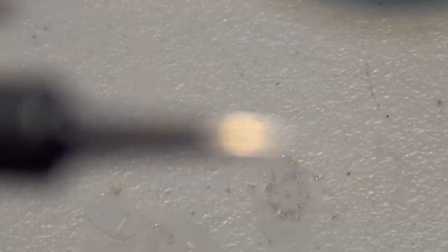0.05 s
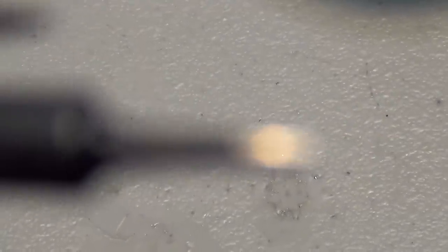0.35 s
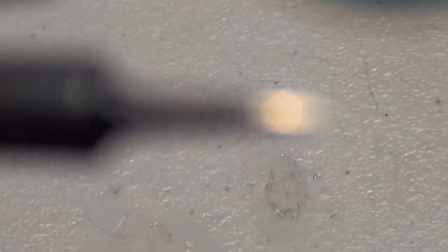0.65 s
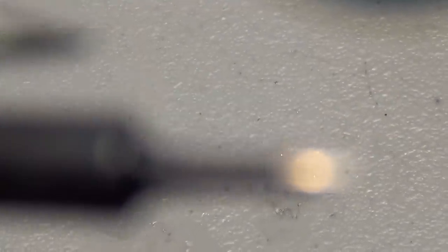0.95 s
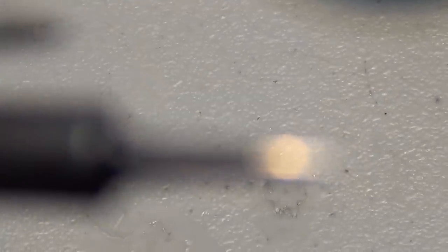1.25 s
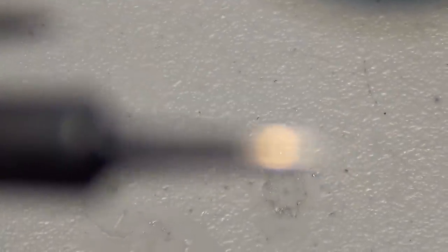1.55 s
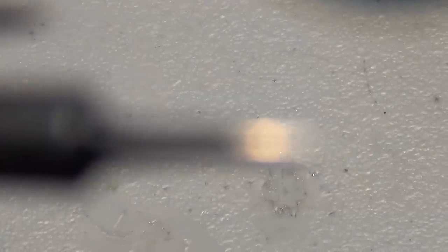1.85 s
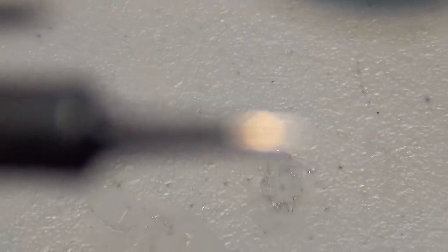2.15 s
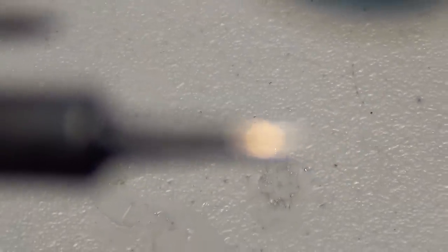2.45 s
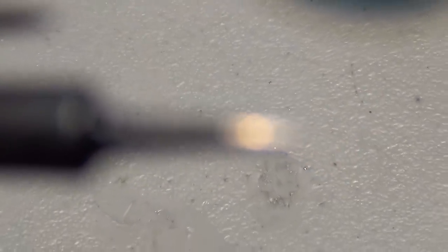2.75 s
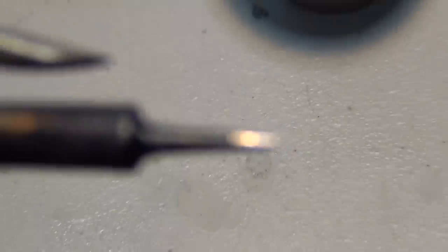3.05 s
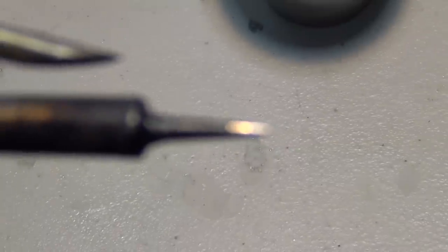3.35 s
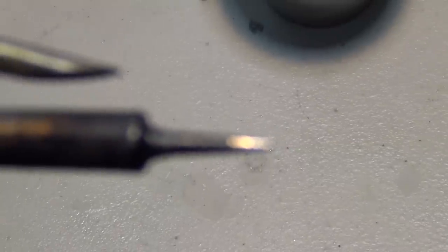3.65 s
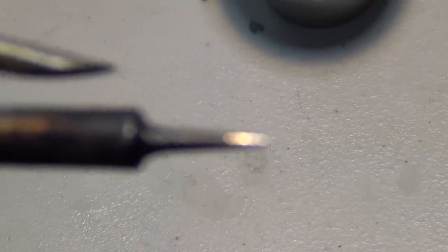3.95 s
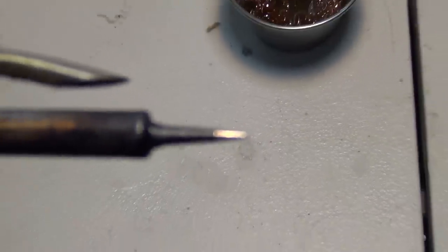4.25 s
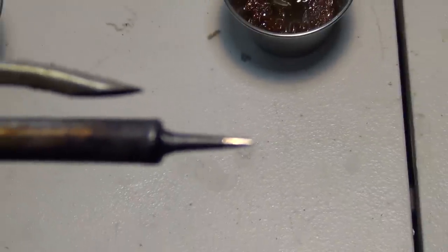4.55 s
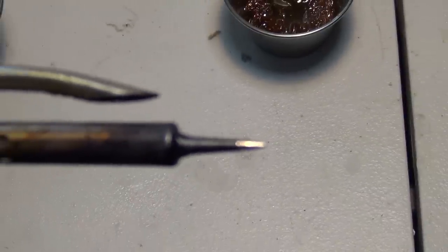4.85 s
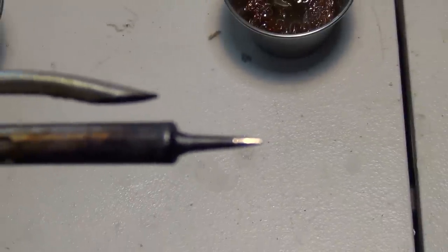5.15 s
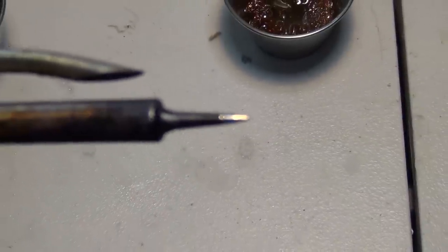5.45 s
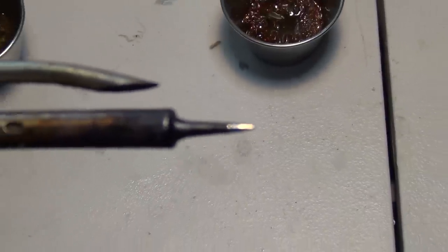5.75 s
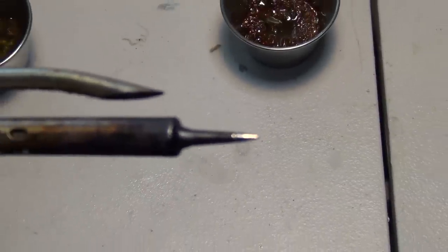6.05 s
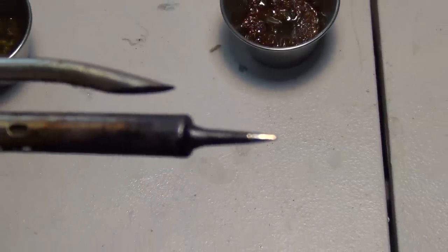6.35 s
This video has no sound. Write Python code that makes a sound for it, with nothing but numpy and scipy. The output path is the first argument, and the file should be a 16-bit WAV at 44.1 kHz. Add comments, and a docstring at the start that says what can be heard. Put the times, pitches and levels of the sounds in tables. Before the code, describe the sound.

Four small plastic clicks cut through a steady airy fan, high hiss and the fluttering whine of a close tape mechanism.

```python
"""A small fume extractor fan runs steadily on a workbench: its air rushes and rings in the housing,
and its blades hum. A thin high hiss sits in the centre, apart from the fan's rush. Close to the
microphone a camera's tape drum whines, and chirps on each of its 30 turns a second as the head
meets the tape. After one faint ping, a small plastic part clicks four times, each time
favouring different ringing pitches."""
import sys
import numpy as np
from scipy import signal
from scipy.fft import rfft, irfft, next_fast_len
from scipy.io import wavfile
from scipy.ndimage import uniform_filter1d, map_coordinates

SR = 44100
rng = np.random.default_rng(int(sys.argv[2]) if len(sys.argv) > 2 else 0)


def waveform_to_disk(signal):
    """Save audio, clipped to [-1, 1], as 16-bit WAV at the path in sys.argv[1]."""
    frames = np.transpose(np.atleast_2d(signal))
    scaled = np.clip(frames, -1, 1) * 32767
    samples = np.round(scaled).astype(np.int16)
    wavfile.write(sys.argv[1], SR, samples)


N = 287532
TIME = np.arange(N) / SR

# tone colour of the thin high hiss: pitch_hz, relative_db
HISS_COLOUR = [(3000, -33), (6000, -10), (7000, -11.5), (7700, -5.5), (8450, -0.5), (9800, -8),
               (10700, -12), (11400, -23.5), (13000, -45)]
# slow swell of the hiss: time_s, level_db
HISS_SWELL = [(0.0, -34.5), (2.35, -31.5), (2.7, -33.7), (3.93, -33), (5.99, -33.6), (6.4, -29.5),
              (6.52, -31)]
# tone colour of the fine fizz above the hiss: pitch_hz, relative_db
FIZZ_COLOUR = [(9500, -25), (11200, -2), (12400, -1.5), (13050, -0.5), (14200, -4.5), (15200, -16)]
# slight swell of the fizz: time_s, level_db
FIZZ_SWELL = [(0, -47.3), (0.5, -46), (2.3, -44.5), (2.8, -48), (4.4, -46), (6.0, -47), (6.5, -45)]
# the ways the plastic part rings: pitch_hz, relative_db, ring_s (time to fade by 60 dB)
PLASTIC_MODES = [(1244, -3.5, 0.024), (1430, -5.5, 0.017), (1730, -5, 0.016), (2190, -9.5, 0.023),
                 (2580, -5.5, 0.014), (2850, -1.5, 0.017), (3570, -1.5, 0.018), (4220, -1, 0.012),
                 (4565, -2, 0.015), (4860, -0.5, 0.012), (5670, -4, 0.013), (8200, 6.5, 0.0063)]
# its clicks: start_s, level_db, low_boost_hz, high_boost_hz, boost_db, tilt_db_per_octave, crack_db
CLICKS = [(3.058, -5, 2200, 4490, 9, -1, -15), (3.8802, -13, 1305, 2220, 13, -2, -17),
          (4.1880, -6.5, 2830, 4760, 9, 0.5, -15), (5.8183, -4.5, 2200, 2750, 3, 0.3, -11.5)]
# strong tones of the drum motor: multiple_of_turn_rate, level_db
MOTOR_TONES = [(10, -42), (22, -49.7), (26, -49), (30, -52), (35, -50), (39, -45), (40, -50.5), (58, -49.5),
               (66, -53.5), (68, -54), (98, -56)]
# tone colour of the head scuffing the tape: pitch_hz, relative_db
SCUFF_COLOUR = [(2000, -3), (3300, 5), (4800, 7.5), (6500, -8), (7600, 17.5), (9000, 3), (11000, -78)]
# weaker chirps as the head sweeps on: delay_s, settled_hz, level_db, left_minus_right_db
AFTER_CHIRPS = [(.005, 5780, -35.5, 5), (.009, 6140, -32.5, 9), (0.0106, 5520, -28, 3),
                (0.0130, 5480, -29.5, 1), (0.0195, 5480, -36.5, 4)]
# electrical hum and a thin whistle: pitch_hz, level_db
ELECTRIC_TONES = [(60, -51.5), (120, -45.5), (15734, -77)]
# weaker blade tones: multiple_of_blade_rate, level_db
WEAK_BLADE_TONES = [(1, -52.5), (4, -56)]
# swell of the tone at twice the blade rate: time_s, relative_db
SECOND_TONE_SWELL = [(0.1, -37.5), (0.73, -39.5), (0.75, -43), (2.3, -37.5), (3.2, -41), (3.21, -51),
                     (3.67, -40), (3.71, -45), (3.92, -34.5), (4.36, -46), (4.92, -48), (4.94, -38.5),
                     (5.7, -39), (5.71, -48.5), (6.42, -39.5)]
# slow beating near 390 Hz, at three times the blade rate: time_s, relative_db
THIRD_TONE_SWELL = [(0.1, -40.5), (0.24, -34), (0.35, -41), (1.0, -44), (1.02, -55), (1.15, -36.5),
                    (1.61, -48), (2.0, -35.5), (2.42, -52), (3.07, -35), (3.29, -54), (3.8, -36),
                    (3.9, -49), (5.03, -39), (5.33, -55), (5.77, -36.5), (5.8, -43), (6.42, -54)]
# tone colour of the air rushing through the fan: pitch_hz, relative_db
RUSH_COLOUR = [(25, -30), (45, -18), (82, -27), (98, -1), (190, 1), (290, -1), (440, -2), (485, -7.5),
               (630, -6), (800, -7.5), (1040, -10), (1200, -7.5), (2000, -12), (2600, -16.5), (5000, -20.5),
               (11000, -50.5)]
# how alike the rush is on the left and right: pitch_hz, likeness (1 = the same)
RUSH_LIKENESS = [(50, 1), (200, 0.94), (1800, 0.97), (5000, 1)]
# the steady sound is louder on the left, its highest treble centred: pitch_hz, left_minus_right_db
LEFT_LEAN = [(50, 2.2), (130, 4.3), (350, 5.8), (900, 4.9), (7000, 4.8), (10000, 0)]

BLADE_HZ, DRUM_HZ = 129.5, 30  # blade passes and drum turns a second


def amp(db):
    """Turn decibels into a gain."""
    return 10 ** (np.asarray(db) / 20)


def unit(x):
    """Scale a sound to an average strength (rms) of 1."""
    return x / np.sqrt(np.mean(x ** 2) + 1e-20)


def at_pitch(table, hz):
    """Read between a table's rows on a musical (log) pitch scale."""
    pitches, values = np.transpose(table)
    return np.interp(np.log(hz + 1), np.log(pitches + 1), values)


def over_time(table):
    """Join a table's points in time with straight lines."""
    return np.interp(TIME, *np.transpose(table))


def wobble(rate):
    """A smooth curve through `rate` random points a second."""
    return map_coordinates(rng.standard_normal(int(N * rate / SR) + 4), [TIME * rate])


def filtered(x, gain_at):
    """Give each frequency in a sound its own gain."""
    size = next_fast_len(N + SR // 2)
    return irfft(rfft(x, size) * gain_at(np.fft.rfftfreq(size, 1 / SR)), size)[..., :N]


def pan(lean_db):
    """Left and right gains; a positive lean is louder on the left."""
    left = amp(np.atleast_1d(lean_db))
    return 2 * np.array([left, np.ones_like(left)]) / (1 + left)


def noise(colour, patchy_db):
    """Coloured noise with drifting louder and softer patches."""
    grid = signal.stft(rng.standard_normal(N), nperseg=512)[2]
    patches = uniform_filter1d(rng.standard_normal(grid.shape), size=6, axis=0)  # smooth over pitch
    patches = uniform_filter1d(patches, size=14, axis=1)  # and over time
    patchy = signal.istft(grid * amp(patchy_db * unit(patches)), nperseg=512)[1][:N]
    return unit(filtered(patchy, lambda hz: amp(at_pitch(colour, hz))))


def tones(rows, turns, waver_db, flutter_radians=0.16):
    """Tones at whole multiples of a spin; each wavers in level and is blurred by a quick flutter."""
    phase = lambda k: 2 * np.pi * (round(k) * turns + rng.random()) + flutter_radians * wobble(35)
    return sum(np.sqrt(2) * amp(db + waver_db * wobble(3.99)) * np.sin(phase(k)) for k, db in rows)


def high_hiss(lift_db=0.42):
    """A thin hiss swells slowly in the centre, with a higher, steadier fizz."""
    hiss = amp(over_time(HISS_SWELL) + lift_db) * noise(HISS_COLOUR, patchy_db=0.5)
    fizz = amp(over_time(FIZZ_SWELL)) * noise(FIZZ_COLOUR, patchy_db=1.0)
    return hiss + fizz


def bench_echo(x, echo_db=-13, ring_s=0.045):
    """Add short reflections from the bench and what stands on it."""
    t = np.arange(SR // 4) / SR
    tail = rng.standard_normal((2, len(t))) * amp(-60 * t / ring_s) * (t > .003)
    return x + amp(echo_db) * signal.fftconvolve(x, tail / np.linalg.norm(tail[0]), axes=1)[:, :N]


def ping(start_s=0.9152, pitch_hz=3070, level_db=-31.5, ring_s=0.052, attack_s=.0015):
    """A faint, brief ping near 3 kHz."""
    t = np.maximum(TIME - start_s, 0)
    loudness = amp(level_db - 60 * t / ring_s) * (1 - np.exp(-t / attack_s))
    return pan(lean_db=4) * loudness * np.sin(2 * np.pi * pitch_hz * t)


def plastic_clicks(contact_s=0.00077, boost_octaves=.08, crack_s=0.028, crack_top_hz=5500):
    """Each gritty crack sets the plastic ringing, with a boost near two pitches."""
    out, t = np.zeros(N + SR), np.arange(SR // 10) / SR
    hz, mode_db, ring_s = np.transpose(PLASTIC_MODES)[:, :, None]
    band = signal.butter(2, [hz.min(), crack_top_hz], "bandpass", fs=SR, output="sos")
    near = lambda centre_hz: np.exp(-(np.log2(hz / centre_hz) / boost_octaves) ** 2)
    direction = np.cos(np.pi * np.arange(len(hz)))[:, None]  # neighbouring modes start opposite ways
    attack = 1 - np.exp(-(t / contact_s) ** 2)
    for start_s, db, low_hz, high_hz, boost_db, tilt_db, crack_db in CLICKS:
        levels = mode_db + boost_db * (near(low_hz) + near(high_hz)) + tilt_db * np.log2(hz / hz.min())
        modes = direction * amp(levels - 60 * t / ring_s) * np.sin(2 * np.pi * hz * t)
        ring = modes.sum(axis=0) / np.linalg.norm(amp(levels))
        grit = unit(signal.sosfilt(band, rng.standard_normal(len(t))))
        crack = amp(crack_db - 60 * t / crack_s) * grit
        out[round(start_s * SR):][:len(t)] += amp(db) * (ring + crack) * attack
    return pan(lean_db=3.7) * out[:N]


def drum_motor(buzz_db=-58.5, buzz_peak_hz=1300, db_per_octave=-6):
    """The drum's motor whines: a few strong tones over a buzz of evenly spaced weak ones."""
    turns = DRUM_HZ * TIME
    strong = [round(k) for k, db in MOTOR_TONES]
    weak_db = lambda k: buzz_db + db_per_octave * abs(np.log2(k * DRUM_HZ / buzz_peak_hz))
    weak = [(k, weak_db(k) + rng.normal(0, 2)) for k in range(31, 77) if k not in strong]
    return tones(MOTOR_TONES, turns, waver_db=1.2) + tones(weak, turns, waver_db=2)


def chirp(since_s, settled_hz, lean_db, drop_hz, rise_s, sharpness, glide_s=0.00056):
    """A tiny tone that swells and dies; it starts high and drops to its settled pitch."""
    t = np.maximum(since_s, 0)
    swell = (t / rise_s * np.exp(1 - t / rise_s)) ** sharpness
    phase = 2 * np.pi * (settled_hz * t + drop_hz * glide_s * (1 - np.exp(-t / glide_s)))
    return pan(lean_db) * swell * np.sin([phase, phase + 0.99])  # the right side is slightly ahead


def drum_chirps(scatter_db=0.7, drift_s=.00006, jitter_s=.000036,
                scuff_s=0.0037, ring_hz=5460, ring_s=0.18):
    """Each turn, a little early or late, the head scuffs the tape, which chirps and rings on faintly."""
    turn, part_of_turn = np.divmod(np.maximum(TIME + drift_s * wobble(3), 0) * DRUM_HZ, 1)
    lateness, force = rng.standard_normal((N * DRUM_HZ // SR + 2, 2))[turn.astype(int)].T
    since_s = np.maximum(part_of_turn / DRUM_HZ - jitter_s * lateness, 0)
    scuff = pan(lean_db=12.5) * amp(-31) * np.exp(-since_s / scuff_s)
    scuff = scuff * noise(SCUFF_COLOUR, patchy_db=-1.5)
    chirps = amp(-16) * chirp(since_s, 5399, lean_db=7, drop_hz=650, rise_s=0.00081, sharpness=0.72)
    for delay_s, hz, db, lean_db in AFTER_CHIRPS:
        chirps += amp(db) * chirp(since_s - delay_s, hz, lean_db, drop_hz=200, rise_s=0.0016, sharpness=0.9)
    ring = pan(lean_db=-2) * amp(-39.5 - 60 * since_s / ring_s) * np.sin(2 * np.pi * ring_hz * since_s)
    return scuff + amp(scatter_db * force) * (chirps + ring)


def fan_housing(pitch_hz=1176, level_db=-50.5, half_width_octaves=0.033):
    """The airflow keeps the fan's housing ringing around one pitch."""
    peak = lambda hz: 1 / (1 + (np.log2((hz + 1) / pitch_hz) / half_width_octaves) ** 2)
    return amp(level_db) * unit(filtered(rng.standard_normal(N), peak))


def fan_hum(pitch_drift=0.002, trim_db=-2):
    """Blade tones drift with the load; the second swells and fades, and the third rises and falls in a slow
    beat near 390 Hz; the electrical hum holds its pitch."""
    passes = np.cumsum(BLADE_HZ * (1 + pitch_drift * wobble(3.05))) / SR
    swelling = [(2, over_time(SECOND_TONE_SWELL) + trim_db), (3, over_time(THIRD_TONE_SWELL) + trim_db)]
    electric = sum(np.sqrt(2) * amp(db) * np.sin(2 * np.pi * hz * TIME) for hz, db in ELECTRIC_TONES)
    blades = tones(WEAK_BLADE_TONES, passes, waver_db=3) + tones(swelling, passes, waver_db=-0.2)
    return blades + electric


def fan_rush(level_db=-32.5):
    """Air swirls through the fan with a low rush, nearly alike on the left and right."""
    spread = lambda hz: np.arccos(np.clip(at_pitch(RUSH_LIKENESS, hz), -1, 1)) / 2
    shared = filtered(noise(RUSH_COLOUR, patchy_db=0.12), lambda hz: np.cos(spread(hz)))
    opposed = filtered(noise(RUSH_COLOUR, patchy_db=8.5), lambda hz: np.sin(spread(hz)))
    return amp(level_db) * np.array([shared + opposed, shared - opposed])


def scene():
    """Mix everything; the fan and the drum motor are louder on the left."""
    steady = fan_rush() + fan_hum() + fan_housing() + drum_motor()
    steady = filtered(steady, lambda hz: pan(at_pitch(LEFT_LEAN, hz)))
    return steady + high_hiss() + drum_chirps() + bench_echo(plastic_clicks() + ping())


def record(dry):
    """The camera cuts off the very highest treble."""
    return filtered(dry, lambda hz: hz < 15850)


dry = scene()
out = record(dry)
waveform_to_disk(out)
```